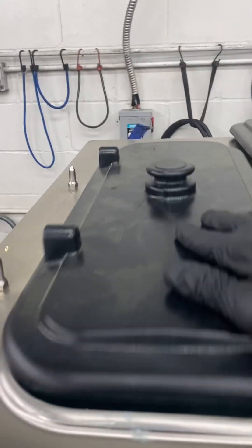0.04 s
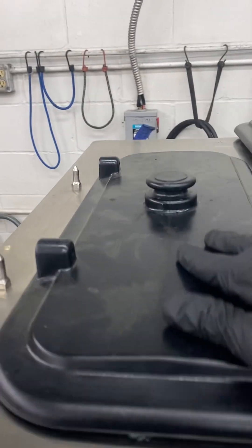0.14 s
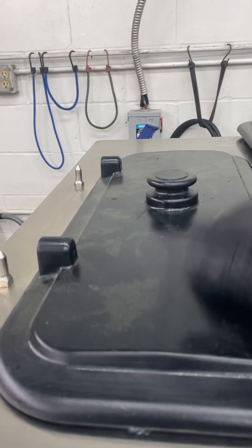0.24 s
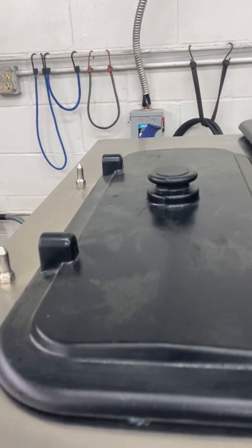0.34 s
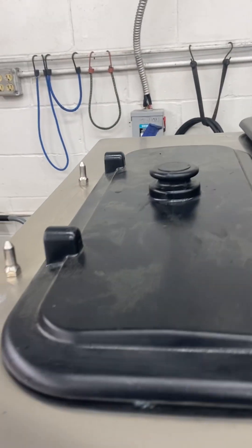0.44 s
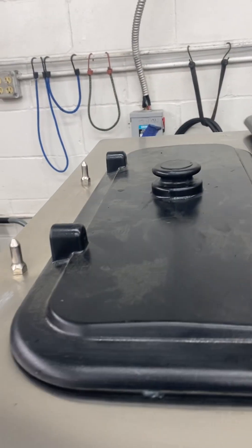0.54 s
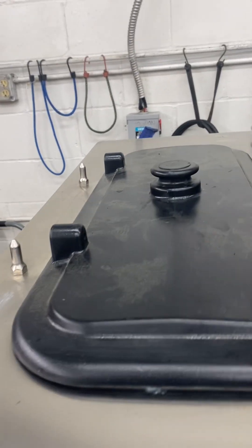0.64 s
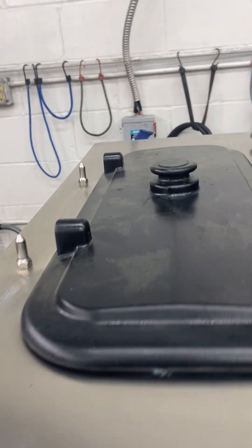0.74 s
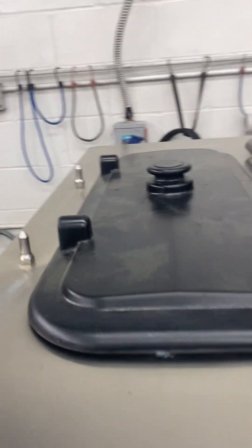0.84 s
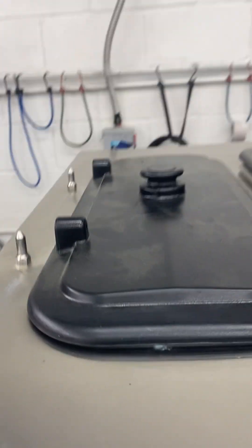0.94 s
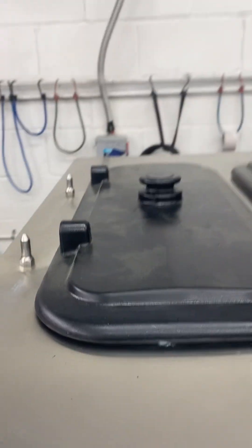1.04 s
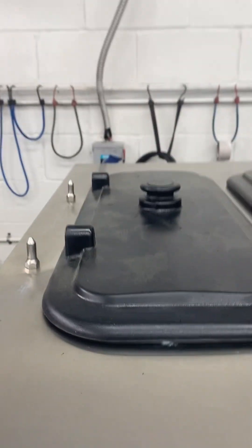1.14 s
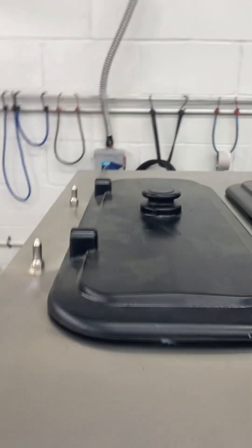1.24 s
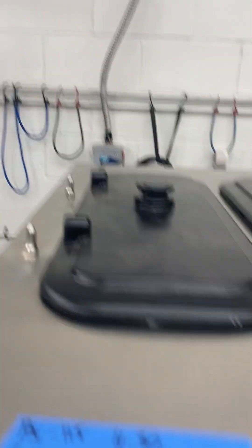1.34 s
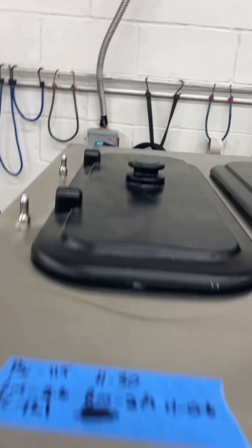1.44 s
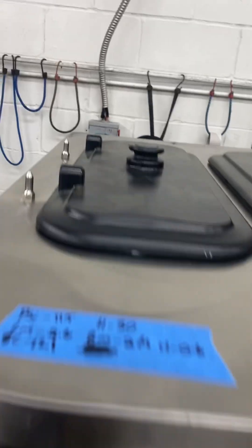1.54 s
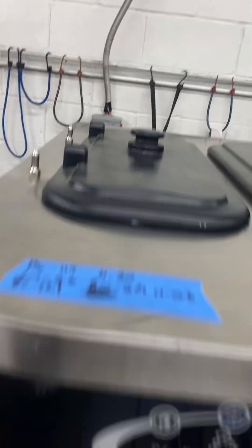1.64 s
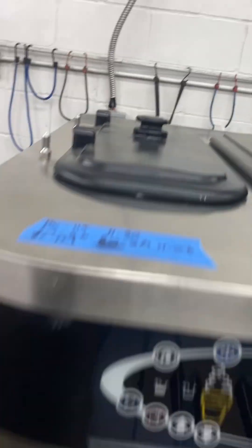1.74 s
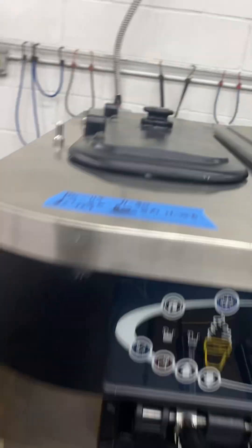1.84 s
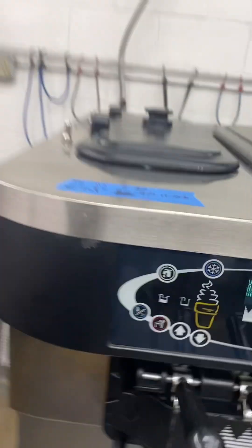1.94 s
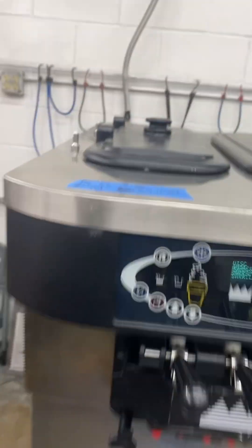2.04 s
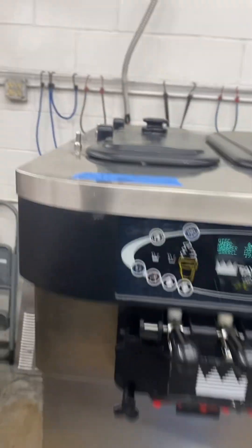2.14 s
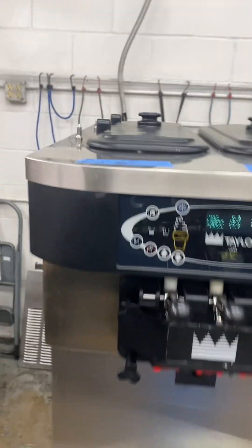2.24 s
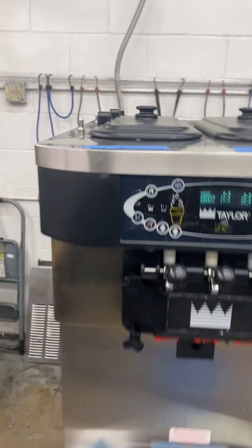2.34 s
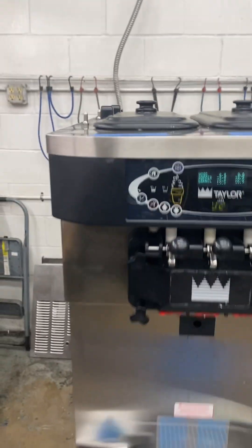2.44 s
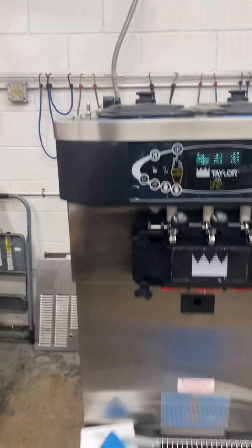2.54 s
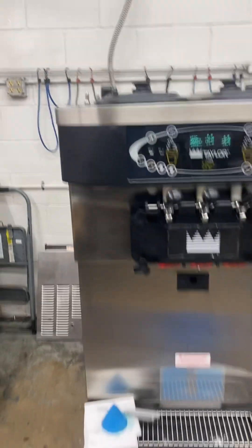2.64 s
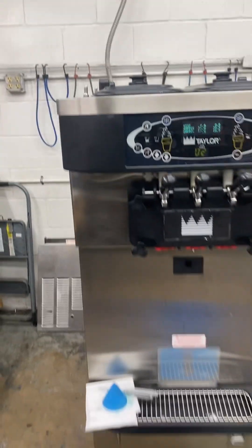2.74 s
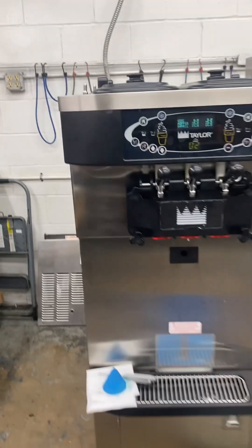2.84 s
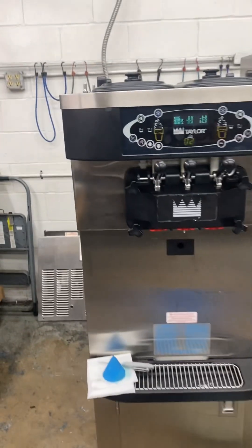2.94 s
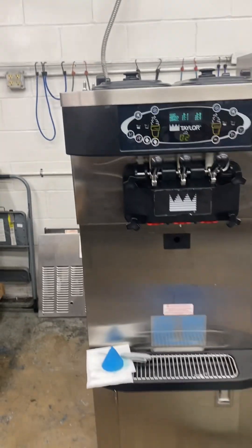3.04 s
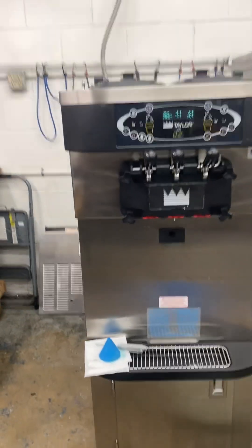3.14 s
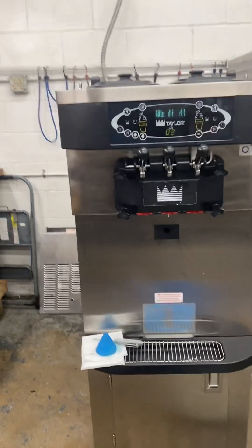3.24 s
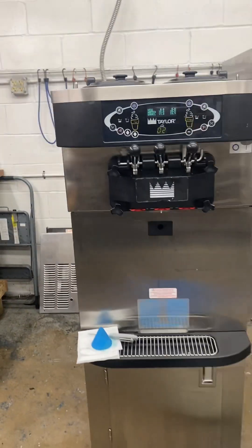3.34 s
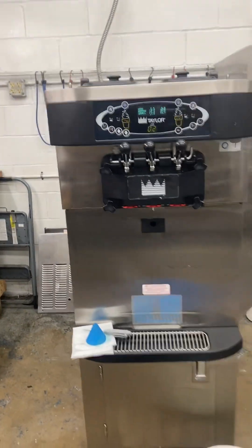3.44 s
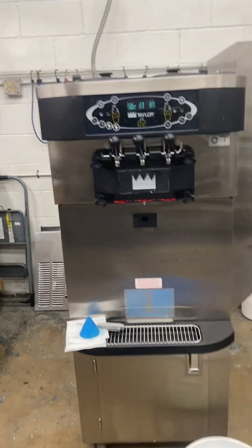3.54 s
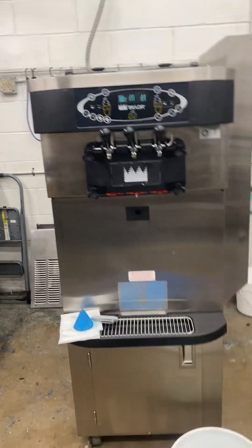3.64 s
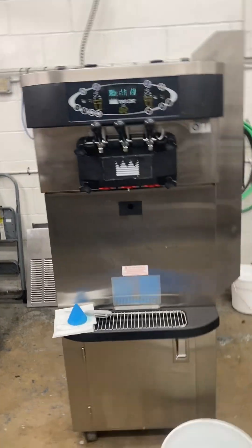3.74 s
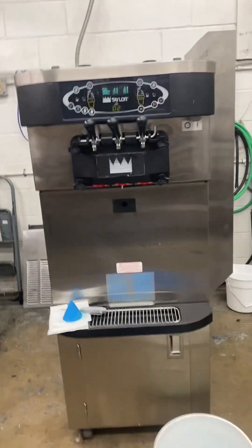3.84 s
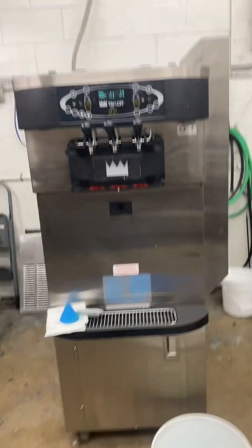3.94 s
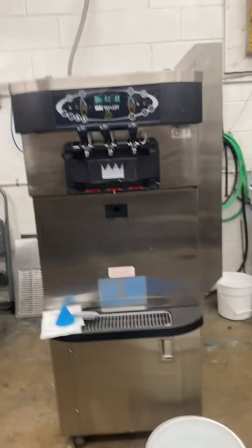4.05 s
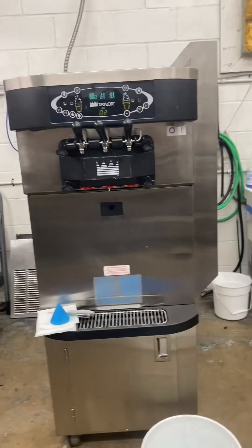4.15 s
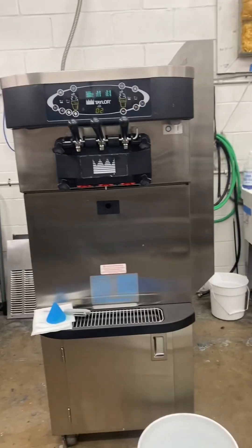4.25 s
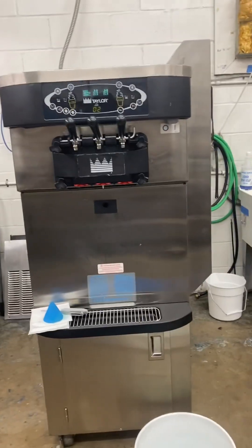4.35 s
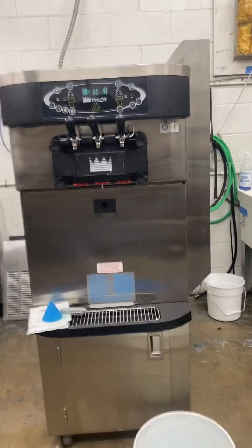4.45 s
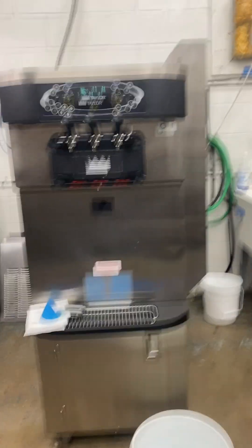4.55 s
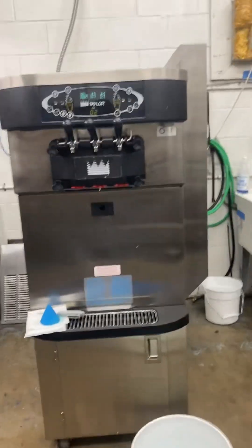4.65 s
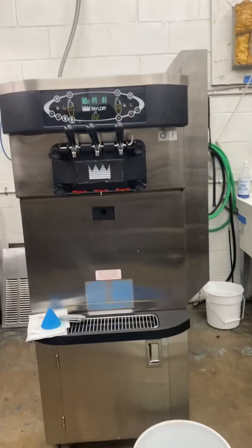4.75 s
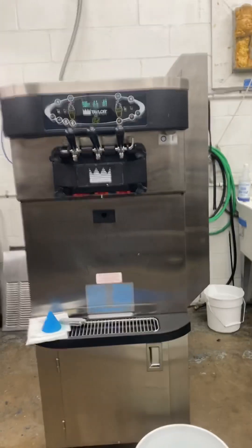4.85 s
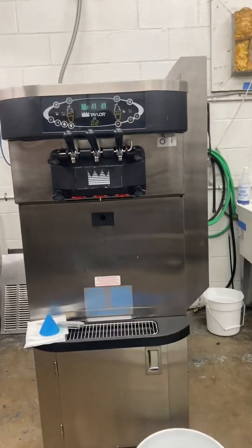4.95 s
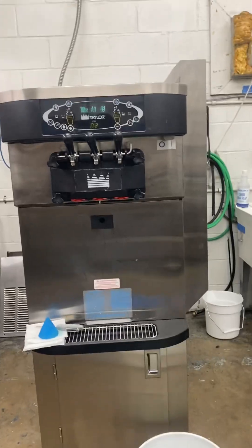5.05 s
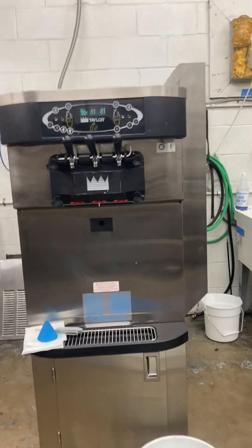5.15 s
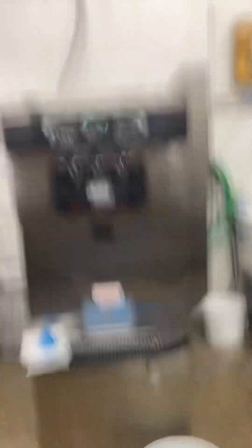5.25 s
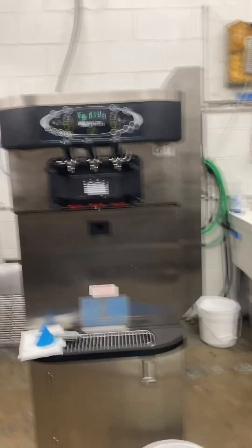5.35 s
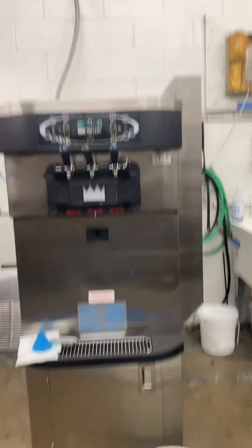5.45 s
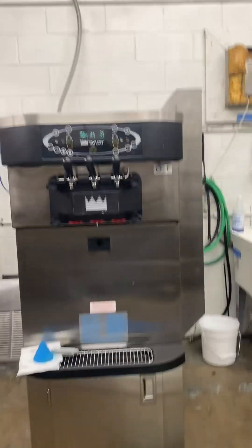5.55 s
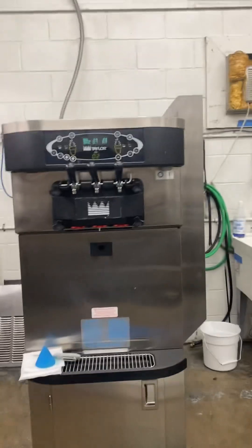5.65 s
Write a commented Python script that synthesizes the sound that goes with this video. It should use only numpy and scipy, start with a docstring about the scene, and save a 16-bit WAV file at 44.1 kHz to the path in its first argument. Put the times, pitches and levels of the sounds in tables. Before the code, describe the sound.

A handheld stereo phone starts close to a soft-serve machine in a hard-walled workshop. Right away, at about 0.05 to 0.16 s, a plastic lid bangs on a steel hopper in a loud, hollow, rattling burst, nearly overloading. It scrapes briefly, clatters again at 0.46 to 0.6 s, shuffles faintly, then knocks home at 0.95 to 1.05 s with quick weakening bounces and a soft drag until 1.4 s. Short echoes follow. Throughout, the machine runs: low electrical hum, fan and compressor roar, faint buzz, airy hiss, and a strong whine near 1300 Hz with a thinner whistle above. From about 1.5 to 4 s, the phone moves back and these tones swell, dip and shift between sides. Soft thumps come from 2.2 s, with more finger bumps from 4.2 s. Crisp taps and clicks stand out near 4.43, 5.2 to 5.3 and 5.65 s, while the machine continues to the end.

```python
"""A hard-walled workshop, where a soft-serve machine hums and whines near a hand-held phone.
A hand slides a plastic lid over a steel hopper and knocks it home in three rattling bursts: ringing modes,
loose clatter and scraping noise. Then the phone backs away through the standing waves of the motor tones,
made of swelling sines, and fingers shift on its case in short damped swings. Shaped noise makes the
roar, hiss and rumble, and a repeating rattle makes the buzz."""
import sys
import numpy as np
from scipy import signal
from scipy.fft import rfft, irfft
from scipy.io import wavfile
from scipy.ndimage import uniform_filter1d

SR = 44100
rng = np.random.default_rng(int(sys.argv[2]) if len(sys.argv) > 2 else 0)


def store_wav(level_fs):
    """Save 16-bit WAV to argv[1]."""
    pcm = np.round(np.clip(np.atleast_2d(level_fs), -1, 1) * 32767)
    wavfile.write(sys.argv[1], SR, pcm.T.astype(np.int16))


N = 251800  # length in samples
MAINS_HZ = 59.97


def amp(db):
    """Turn decibels into a plain multiplier."""
    return 10 ** (np.asarray(db) / 20)


def unit(x):
    """Scale a sound to an rms of 1."""
    return x / np.sqrt(np.mean(x ** 2) + 1e-20)


def over_hz(points, hz):
    """Read a curve of (Hz, value) points, joined evenly in pitch."""
    f, value = np.transpose(points)
    return np.interp(np.log(hz + 1), np.log(f + 1), value)


def over_time(rows, t):
    """Read each column of a table as a curve over time; the first column is seconds."""
    s, *columns = np.transpose(rows)
    return [np.interp(t, s, column) for column in columns]


def add(mix, s, sound):
    """Lay a sound into the mix from s seconds on, cut off at the end of the mix."""
    part = mix[..., round(s * SR):][..., :sound.shape[-1]]
    part += sound[..., :part.shape[-1]]


def wander(fastest_hz):
    """A slow random drift of rms 1, summed from sines up to fastest_hz."""
    t = np.arange(0, N / SR + 1, .01)
    slow = 0
    for f in fastest_hz * np.geomspace(.1, 1, num=12):
        slow = slow + np.sin(2 * np.pi * (f * t + rng.random())) / np.sqrt(f)
    return np.interp(np.arange(N) / SR, t, unit(slow))


def pair(common, opposed):
    """Left and right from what the two ports hear alike and what they hear with opposite sign."""
    return np.array([common + opposed, common - opposed])


def colour(x, shape):
    """Filter a sound by a curve of (Hz, dB) points."""
    return irfft(rfft(x) * amp(over_hz(shape, np.fft.rfftfreq(len(x), 1 / SR))), len(x))


def tone(hz, left_db, right_db, lead, slip=0):
    """One sine at both ports, left ahead by lead (rad); a moving slip (turns) blurs its pitch."""
    turn = 2 * np.pi * (hz * np.arange(N) / SR + rng.random() + slip)
    left = amp(left_db) * np.sin(turn + lead / 2)
    right = amp(right_db) * np.sin(turn - lead / 2)
    return np.sqrt(2) * np.array([left, right])


def noise(shape, level_db, patchy_db):
    """Noise from random short spectra with drifting patches; shape and level_db add up in dB."""
    frames, hz = N // 256 + 5, np.fft.rfftfreq(1024, 1 / SR)
    a, b, patches = rng.standard_normal((frames, 513, 3)).T
    patches = uniform_filter1d(patches, size=10, axis=0)
    patches = unit(uniform_filter1d(patches, size=12, axis=1))
    frame_s = np.arange(frames) * 256 / SR
    db = over_hz(shape, hz)[:, None] + level_db(hz[:, None], frame_s) + patchy_db * patches
    return signal.istft((a + 1j * b) * amp(db), nperseg=1024, noverlap=768)[1][:N]


# How far ahead the left port hears a near source. Each row: pitch in Hz, left lead in radians.
PORT_LEAD = [(0, 0), (2070, -.1), (3190, 2.4), (3880, 1.), (5170, .4), (6550, 2.7), (8180, 3.6),
             (9730, 6.1), (11500, 6.7), (12600, 9.2), (14700, 9.9), (16500, 12.6)]
# How much louder the left port hears it. Each row: pitch in Hz, left minus right in dB.
PORT_BALANCE = [(60, -.5), (200, -1.5), (380, -3), (700, -4), (1290, -3), (2380, -1.5), (4400, 0),
                (15000, 0)]


def ports(x):
    """A near source reaches the two ports with its own lead and balance."""
    hz = np.fft.rfftfreq(N, 1 / SR)
    half = amp(over_hz(PORT_BALANCE, hz) / 2) * np.exp(.5j * over_hz(PORT_LEAD, hz))
    return irfft(rfft(x) * np.array([half, 1 / half]), N)


def ring(modes, tilt_db, chance, scatter_db, centre_hz=500, focus_db=0):
    """One blow: the modes rise together, any focus favours those near centre_hz; peak 1."""
    hz, db, t60 = np.transpose(modes)[..., None]
    t = np.arange(9000) / SR
    size, detune = chance[..., None]
    octaves = np.log2(hz / centre_hz)
    focus = focus_db * np.minimum(abs(octaves), 1.3)
    db = db + scatter_db * size + tilt_db * octaves - focus - 60 * t / t60
    swing = np.sin(2 * np.pi * hz * (1 + 0.021 * detune) * t)
    sound = (np.sign(detune) * amp(db) * swing).sum(0)
    sound = sound * (1 - np.exp(-t / 0.00049))  # quick rise in seconds
    return sound / abs(sound).max()


# The lid's own ringing tones over the hopper, before random scatter.
# Each row: pitch in Hz, relative level in dB, time to fade by 60 dB in seconds.
LID = [(79, -20, 0.12), (151.6, -11.5, 0.11), (253, 2.5, 0.036), (334, -3, 0.098), (454, 0, 0.05),
       (593, -9, 0.086), (725.4, -8.5, 0.09), (907, -7, 0.04), (1147, -10.5, 0.067), (1387, -16, 0.065),
       (1745, -8, 0.036), (2050, -14, 0.031), (2530, -20, 0.038), (3340, -15, 0.017)]
STRUCK_DB, STRUCK_T60_S = 3, 0.044


def struck(hz):
    """Lid modes, plus the patch of lid under the blow, which rings at its own pitch."""
    return [*LID, (hz, STRUCK_DB, STRUCK_T60_S)]


# The lid settles after a burst.
# Each row: start in seconds, first blow in dB, first rim tick in dB, number of bounces.
SETTLE = [(0.581, -22.5, -55, 4), (1.036, -16.5, -28.5, 7)]
BOUNCE_GAP_S, BOUNCE_HZ = 0.011, 380  # both varied at random
BOUNCE_LOSS_DB, BOUNCE_TICK_LOSS_DB = 2, 2.5  # lost at each bounce


def bounces():
    """Uneven, ever weaker knocks as the lid settles, as rows like those of KNOCKS."""
    rows = []
    for s, blow_db, tick_db, many in SETTLE:
        gap, hard, where = rng.random((round(many), 3)).T
        k = np.arange(len(gap))
        starts = s + BOUNCE_GAP_S * (k + .6 * gap)
        blows = blow_db - BOUNCE_LOSS_DB * k
        ticks = tick_db - BOUNCE_TICK_LOSS_DB * k
        rows += zip(starts, blows, ticks, 0.43 * hard, BOUNCE_HZ * (0.76 + where))
    return rows


# Knocks of the lid. Each row: start in seconds, blow in dB, rim tick in dB before a trim,
# hardness from 0 to 1, most excited pitch in Hz.
KNOCKS = [(.050, -13.5, -38, 0, 457), (0.065, -12.5, -41, 0.5, 399), (.078, -10, -30, 0.7, 295),
          (0.083, -3.5, -8.5, 0.92, 230), (.088, 4.5, -48, 0.38, 240), (0.097, -1, -11.5, 0.9, 300),
          (.106, -3, -26, 0.9, 610), (.115, -2, -41, 0.4, 306), (0.12, -3.5, -11.5, 0.5, 990),
          (.1255, -7, -11.5, 0, 336), (0.135, -6, -17, 0.1, 203), (.144, -20, -33, 0.2, 298),
          (.153, -25, -42, 0.6, 297), (.162, -17, -55, 0, 240), (.458, -6.5, -15.5, 0.9, 544),
          (.464, -2, -49, 0.7, 325), (.472, -6, -50, 0.2, 470), (.479, -4, -36, 0.3, 306),
          (.491, -2.5, -43, 0.2, 380), (.5045, -6.5, -33, 1, 695), (.509, -8.5, -47, 0.7, 333),
          (.514, -7.5, -50, 0.2, 150), (.518, -12, -43, .9, 1000), (.522, -4.5, -37, 0.9, 614),
          (.525, -11.5, -45, 0.7, 1180), (.527, -7, -42, 0.5, 342), (.536, -7.5, -32, 0.9, 334),
          (.540, -6.5, -45, 0.93, 720), (.556, -15, -46, 0.7, 1190), (0.567, -12, -42, 0.6, 678),
          (.576, -14, -50, 0.4, 460), (0.623, -40, -61, 0.3, 338), (.654, -11.5, -55, 0, 334),
          (.688, -16.5, -58, 0.4, 327), (.706, -22, -58, .2, 240), (.768, -26, -58, 0.4, 325),
          (.794, -23, -57, 0.7, 610), (.799, -21, -57, .3, 300), (.811, -21.5, -56, 0.7, 780),
          (.813, -21, -58, 0.1, 173), (.832, -33, -63, .3, 765), (.836, -23, -58, 0, 165),
          (.861, -19.5, -58, .1, 270), (.874, -22, -58, 0, 283), (.889, -20, -58, .1, 262),
          (.904, -21, -58, .1, 300), (.914, -19, -49, 0.7, 402), (.921, -16.5, -50, .6, 450),
          (.936, -15, -50, .4, 210), (.944, -14, -48, 0.3, 233), (.955, -19, -28, .5, 300),
          (.959, -17, -9, 0.2, 487), (.963, -4, -42, 0.55, 244), (.967, -4, -30, 0.4, 224.6),
          (.974, -8, -14.5, 0.2, 231), (.979, -8, -31, .5, 328), (.985, -2.5, -14, 0.2, 328),
          (0.989, -10, -11, 0.7, 465), (0.994, -10, -15.5, 0.8, 783), (.998, -11.5, -22, 0.4, 120),
          (1.004, -9, -24, 1, 860), (1.011, -7.5, -27, 0.4, 246), (1.027, -9.5, -27, 0.05, 270),
          (1.039, -12.5, -35, 0.5, 724)]
# Ringing of the rim against steel, before random scatter.
# Each row: pitch in Hz, relative level in dB, time to fade by 60 dB in seconds.
RIM = [(2720, -5, 0.015), (3620, -7, 0.015), (5120, -1, 0.017), (5700, 6, 0.0076), (6200, 13, 0.012),
       (8800, 2.5, 0.0084), (9800, 2.5, 0.0055), (11370, 0, 0.0044), (14900, -3, 0.0056)]
# Colour of the loose clatter after each tick. Each row: pitch in Hz, relative level in dB per Hz.
CLATTER = [(300, -20), (800, 12.5), (2000, 6), (3000, -0.5), (5000, 0.5), (7500, 0), (10000, -12),
           (13000, -11), (16000, -34)]
# The clatter's parts: a sharp crack, a grainy shake and a lingering tail, relative to each other.
CRACK_DB, SHAKE_DB, TAIL_DB = 6.5, -14, -28
CRACK_T60_S, SHAKE_T60_S, TAIL_T60_S = 0.011, 0.06, 0.19
# Strokes of the lid dragged over the steel. Each row: start in seconds, end in seconds,
# start level in dB, end level in dB, most excited pitch in Hz.
DRAG = [(0., 0.031, -27, -31, 243), (0.028, 0.068, -39, -17.5, 460), (0.172, 0.272, -24, -38.5, 208),
        (0.269, 0.415, -32, -39, 350), (0.467, 0.556, -31, -32, 1117), (0.558, 0.66, -24.5, -23.5, 346),
        (0.582, 0.739, -31, -35.5, 730), (0.743, 0.86, -30, -39, 295), (0.906, 0.96, -31, -24, 276),
        (1.08, 1.17, -28.5, -41, 300), (1.15, 1.416, -33.5, -51, 313)]


def lid():
    """Knocks ring lid and rim and shake loose clatter; dragging feeds the lid a hail of tiny slips."""
    out, t = np.zeros(N), np.arange(9000) / SR
    # about 450 tiny contacts a second make the clatter grainy
    contacts = amp(4.1 * np.minimum(rng.exponential(1, N), 4)) * (rng.random(N) < 450 / SR)
    contacts = uniform_filter1d(contacts, size=60)
    loose = unit(colour(rng.standard_normal(N), CLATTER))
    grain = unit(0.45 + unit(contacts))
    clatter_rise = 1 - np.exp(-(t / 0.0017) ** 2)
    for s, blow_db, tick_db, hard, hz in [*KNOCKS, *bounces()]:
        chance = rng.standard_normal((2, len(RIM) + len(LID) + 1))
        rim_chance, lid_chance = chance[:, :len(RIM)], chance[:, len(RIM):]
        tilt_db = 8.2 * (hard - .5)  # harder blows sound brighter
        body = ring(struck(hz), tilt_db, lid_chance, scatter_db=2.5, centre_hz=hz, focus_db=6.0)
        add(out, s, amp(blow_db) * body)
        add(out, s, amp(tick_db - 1.5) * ring(RIM, 0, rim_chance, scatter_db=6.5))
        span = slice(round(s * SR), round(s * SR) + len(t))
        crack = amp(CRACK_DB - 60 * t / CRACK_T60_S)
        shake = grain[span] * amp(SHAKE_DB - 60 * t / SHAKE_T60_S)
        tail = amp(TAIL_DB - 60 * t / TAIL_T60_S)
        add(out, s, amp(tick_db + 3.0) * (crack + shake + tail) * clatter_rise * loose[span])
    # about 800 slips a second, of random size and sign
    slips = amp(2.55 * np.minimum(rng.exponential(1, N), 5)) * rng.choice([-1, 1], N)
    slips = slips * (rng.random(N) < 800 / SR)
    for start, end, start_db, end_db, hz in DRAG:
        n = round((end - start) * SR)
        chance = rng.standard_normal((2, len(LID) + 1))
        body = ring(struck(hz), -1.8, chance, scatter_db=0.5, centre_hz=hz, focus_db=6.5)
        feed = slips[round(max(start, 0) * SR):][:n + len(t)]
        scrape = unit(signal.oaconvolve(feed, body)[len(t):][:n])  # skip the build-up
        level = amp(np.linspace(start_db, end_db, n)) * signal.windows.tukey(n, .15)
        add(out, max(start, 0), level * scrape)
    return out


def workshop(x):
    """Echoes off hard walls as sparse random taps: middle pitches last longest, treble dies first."""
    taps = rng.standard_normal(SR // 2) * (rng.random(SR // 2) < .05)
    hz, t, z = signal.stft(taps, SR, nperseg=256)
    t60 = over_hz([(200, 0.083), (2000, 0.2), (10000, 0.051)], hz)[:, None]  # (Hz, s)
    tail = signal.istft(z * amp(-60 * t / t60), SR, nperseg=256)[1]
    return signal.fftconvolve(x, tail / np.linalg.norm(tail))[:N]


def blip(hz, db, turns, glide, settle):
    """A few damped swings of the case; the pitch falls fast and settles at a share of hz; peak at db."""
    u = np.arange(round(8 * turns * SR / hz)) * hz / SR  # time in turns of hz
    phase = settle * u + glide * (1 - np.exp(-u / 2.64))
    swing = (1 - np.exp(-u / 0.039)) * np.exp(-u / turns) * np.sin(2 * np.pi * phase)
    return amp(db) * swing / abs(swing).max()


# Fingers on the phone case; the pitches are nominal, as each swing glides.
# Each row: start in seconds, opposed tick in dB, tick pitch in Hz, common thump in dB, thump pitch in Hz.
GRIP = [(2.179, -58, 250, -26.5, 206), (2.46, -47, 400, -26, 354), (3.578, -47, 500, -26.5, 490),
        (3.952, -21, 670, -37, 117), (4.223, -50, 500, -24.5, 250), (4.242, -42, 490, -25, 261),
        (4.287, -42, 500, -29, 250), (4.299, -43, 400, -25, 262), (4.365, -46, 500, -30, 280),
        (4.4298, -19, 640, -24, 340), (4.439, -26, 403, -22, 324), (4.446, -37, 250, -34, 93),
        (4.522, -26, 600, -28, 241), (4.664, -25, 550, -24.5, 240), (4.831, -22, 600, -24.5, 260),
        (5.021, -27, 600, -26.5, 250), (5.207, -12, 1400, -36, 151), (5.2146, -27, 249, -20.5, 126),
        (5.222, -20, 447, -17, 66.6), (5.226, -32, 500, -24.5, 380), (5.258, -22, 594, -24.5, 211),
        (5.316, -17, 900, -34, 97), (5.629, -39, 600, -27, 305), (5.644, -25, 700, -26, 346),
        (5.67, -19, 1100, -30, 300)]
# Nail clicks on the case. Each row: start in seconds, level in dB, pitch in Hz,
# upper mode in dB relative to the lower, phase blur in radians before smoothing.
CLICKS = [(4.438, -34, 1930, -5, 0.75), (5.207, -16, 1650, -2, 0.17), (5.225, -24, 2150, 2, 0.62),
          (5.230, -23.5, 2200, 4, 0.68), (5.232, -27, 1690, 8, .6), (5.237, -33, 2260, 6, 1.1),
          (5.314, -20, 3740, -18, .3), (5.644, -15.5, 5310, 4.5, 1.9), (5.694, -21.5, 5660, -15, 1.6)]
CLICK_UPPER, CLICK_T60_S = 2.02, 0.0054  # upper mode as a ratio of the lower; fade by 60 dB


def grip():
    """The case flexes: the ports feel ticks in opposition and thumps together; nails click on it."""
    common, opposed = np.zeros((2, N))
    for s, tick_db, tick_hz, thump_db, thump_hz in GRIP:
        add(opposed, s, blip(tick_hz, tick_db, turns=2.6, glide=2.3, settle=0.47))
        add(common, s, blip(thump_hz, thump_db, turns=0.95, glide=0.79, settle=0.87))
    snaps = np.zeros(N)
    t = np.arange(400) / SR
    for s, db, hz, upper_db, blur in CLICKS:
        turn = 2 * np.pi * hz * t + blur * uniform_filter1d(rng.standard_normal(len(t)), size=4)
        crack = np.sin(turn) + amp(upper_db) * np.sin(CLICK_UPPER * turn)
        fade = amp(db - 60 * t / CLICK_T60_S) * (1 - np.exp(-t / 0.00035))
        add(snaps, s, fade * crack)
    return pair(common, opposed) + ports(snaps)


def crossings(nodes, multiple, t):
    """Level change in dB as the phone passes this tone's nodes and bellies, each a smooth bump."""
    db = 0
    for m, s, change_db, width in nodes:
        if round(m) == round(multiple):
            db = db + change_db * np.exp(-((t - s) / width) ** 2)
    return db


# Distance from the machine. Each row: time in seconds, distance from 0 (near) to 1 (far).
AWAY = [(0, 0.091), (2., 0.23), (3.8, 0.89), (4.4, 0.88), (5.71, 1)]
# Strongest motor tone, 22 times the mains, as the phone moves.
# Each row: time in seconds, left in dB, right in dB, left lead in radians.
WHINE = [(0.02, -51, -31.5, 2.9), (0.25, -52, -38, 3.3), (0.4, -51, -33, 3.8), (0.7, -38, -40.5, 3.9),
         (0.9, -31, -29, 6.1), (1.15, -47, -42, 7.4), (1.25, -37.5, -30, 5.3), (1.52, -30, -33.5, 5.5),
         (1.7, -34.5, -34.5, 6.6), (1.85, -30, -26.5, 5.3), (1.95, -41, -33, 8.7), (2.13, -30, -41, 13.7),
         (2.35, -34.5, -32, 13.8), (2.53, -41, -34, 13.7), (2.65, -28, -40, 14.2), (2.83, -38.5, -28, 13.6),
         (2.97, -28, -26.5, 12.7), (3.18, -39.5, -37, 12), (3.5, -44, -29, 13.3), (3.68, -41, -29.5, 13.6),
         (4.05, -40.5, -33.5, 16.2), (4.55, -35, -30.5, 16.8), (5.3, -35, -30, 16.6),
         (5.71, -31, -30, 16.8)]
# Other mains multiples, before slow drift. Each row: multiple, near level in dB, far level in dB,
# left minus right in dB, left lead near in radians, left lead far in radians.
TONES = [(4, -58.5, -47, -1, 0, 0.15), (6, -41, -51, -4, 0.5, -1.9), (10, -59, -45.5, -4, -1.5, 0),
         (18, -51.5, -56, -6, -1.5, 2.3), (20, -48, -44, 5, 4, -2.2), (23, -58, -44.5, 3, 2, -1.9),
         (24, -50.5, -53.5, 2, -1.5, 2), (26, -48, -46.5, -4.5, 2.5, -1)]
# The phone crosses a node (minus) or belly (plus) of a standing wave.
# Each row: multiple of the mains, time in seconds, change in dB, half width in seconds.
NODES = [(4, 1.3, -17, 0.27), (4, 2.85, 8.5, 0.96), (6, 0.42, -2, 0.78), (6, 1.6, 2, 0.51),
         (6, 3.42, -17, 0.47), (10, 2.37, 6, 0.2), (10, 2.85, -3.5, 0.45), (10, 3.9, 0, 0.24),
         (18, 1.2, 0, 0.34), (18, 2.1, 3.5, 0.43), (18, 2.93, -16, 0.46), (18, 3.53, 8.5, 0.34),
         (20, 3.1, -12, 0.1), (20, 3.43, 6, 0.28), (23, 3.1, -9, 0.27), (24, 1.7, 8.5, 0.11),
         (24, 2, 2, .1), (24, 1.98, 11, 0.2), (24, 2.8, -2, 0.17), (24, 2.9, 7, 0.12), (24, 3.53, 11, 0.18),
         (26, 1.07, -10, 0.14), (26, 1.8, -1.5, 0.17), (26, 0.91, 3, 0.079), (26, 3.08, -9, 0.19),
         (26, 3.77, -7, 0.14)]
# Fan whistle, before its swell and flutter. Rows in turn: left in dB, right in dB,
# left lead in radians; each row holds the near value, then the far one.
WHISTLE = [(-66, -51.5), (-51.5, -48.5), (2, 1.8)]
WHISTLE_HZ = 2745
# Slow swell of the whistle. Each row: time in seconds, change in dB.
WHISTLE_SWELL = [(0, -2), (1.2, 2.5), (1.7, 3.5), (2.5, -1), (2.95, 6), (3.4, -3), (4.1, -1.5), (4.5, 1.5),
                 (5.1, 3.5), (5.71, -2)]
# Weaker shaft, fan and winding tones, before drift.
# Each row: pitch in Hz, near level in dB, far level in dB.
FAINT = [(152, -55, -60), (266, -47, -54), (800, -50, -60), (1064, -56, -55), (1855, -57, -71),
         (2159, -65, -62.5), (2288, -65, -58), (2794, -68, -60), (3182, -64, -64), (3354, -63, -68),
         (3461, -74, -64), (3615, -64, -66), (3946, -64, -68)]


def motor():
    """Mains multiples swell and fade through their standing waves; fan whistle and faint tones join."""
    t = np.arange(N) / SR
    out = tone(22 * MAINS_HZ, *over_time(WHINE, t))
    away = over_time(AWAY, t)[0]
    for k, near_db, far_db, tilt_db, near, far in TONES:
        db = near_db + away * (far_db - near_db) + 1.9 * wander(2.97) + crossings(NODES, k, t)
        lead = near + away * (far - near) + 0.19 * wander(1.8)
        out += tone(round(k) * MAINS_HZ, db + tilt_db / 2, db - tilt_db / 2, lead)
    left_db, right_db, lead = (near + away * (far - near) for near, far in WHISTLE)
    flutter_db = 2.3 * wander(17.0) + over_time(WHISTLE_SWELL, t)[0]
    out += tone(WHISTLE_HZ, left_db + flutter_db, right_db + flutter_db, lead, 0.14 * wander(25.))
    for hz, near_db, far_db in FAINT:
        db = near_db + away * (far_db - near_db)
        high = hz > 2000
        apart = min(hz / 1100, 1)  # long waves waver less and reach both ports more alike
        db = db + (2.0 + 0.81 * apart) * wander(2.96)
        db = db - 5.1 * high * (abs(wander(14.)) - .8)  # high tones flutter in short patches
        left_db = db + 2.7 * apart * wander(3.3)
        lead = 1.06 * apart * wander(0.78)
        slip = hz * 8e-5 * wander(12.) + 0.06 * high * wander(30.)
        out += tone(hz, left_db, db, lead, slip)
    return out


# Multiples of the compressor shaft turn (half the mains), rounded to whole numbers when played.
# Each row: multiple, near level in dB, far level in dB, before drift,
# left lead near in radians, left lead far in radians.
SHAFT = [(11, -45.5, -54, 0.14, 1.1), (21, -68, -56.5, 0, 2), (24, -53.5, -66, 0, 5),
         (29, -57, -60, -0.84, -2.5), (32, -63.5, -64.5, 0, 0.5), (42, -69, -54.5, 0, 3),
         (43, -54.5, -49.5, -1.3, -3), (45, -58, -52, -1, -2.5), (47, -59, -51.5, -0.6, -2),
         (49, -50.5, -61, 0, 2.5), (50, -58.5, -60, 0, 0), (51, -58, -60, 0, 0.5), (54, -69, -70, 0, -1),
         (56, -57.5, -54.5, 0, 1.5), (80.46, -60.5, -54, 1, 1.5), (84.3, -62, -59.5, 1, 1),
         (87.2, -65.5, -61.5, 0, 0)]
# Nodes and bellies of those lines; a row acts only where SHAFT has its rounded multiple.
# Each row: multiple, time in seconds, change in dB, half width in seconds.
SHAFT_NODES = [(11, 2.4, 2.5, 0.48), (45, 2.7, 5.5, .3), (47, 3.63, 8.5, .3), (45, 3.55, 5, .2),
               (49, 3.5, 7, .25), (56, 2.8, 0, 0.34), (56, 3.7, 4, 0.34), (80, 3.3, -9, .25),
               (88, 3.4, 2, .4)]


def shaft():
    """Lines on multiples of the shaft turn, each swelling slowly on its own."""
    t = np.arange(N) / SR
    away = over_time(AWAY, t)[0]
    out = 0
    for k, near_db, far_db, near, far in SHAFT:
        db = near_db + away * (far_db - near_db) + 1.16 * wander(2.44) + crossings(SHAFT_NODES, k, t)
        left_db = db + 0.86 * wander(2.7)
        lead = near + away * (far - near) + .4 * wander(1.48)
        out = out + tone(round(k) * MAINS_HZ / 2, left_db, db, lead, 0.037 * wander(20.))
    return out


def buzz():
    """The compressor rattles once per shaft turn: a faint comb of lines that slowly changes its stroke."""
    turns = np.arange(N) * MAINS_HZ / 2 / SR
    place = (turns % 1 * 1470).astype(int)  # 1470 steps in one turn
    strokes = rng.standard_normal((4, 1470))[:, place]
    rattle = sum(amp(5.6 * wander(1.24)) * stroke for stroke in strokes)
    shape = [(300, -40), (600, 1.0), (1400, -14), (1900, -2.5),
             (2600, -1.0), (3600, 4.5), (5000, 2.5), (6200, -35)]  # (Hz, dB)
    return amp(-51) * ports(unit(colour(rattle, shape)))


# Roar that both ports hear alike. Each row: pitch in Hz, relative level in dB per Hz.
ROAR = [(15, -58), (25, -42.5), (126, -4), (192, -11), (251, -4), (427, -11), (595, -11.5), (650, -11.5),
        (1130, -15.5), (1320, -8.5), (1410, -17), (1760, -17), (2750, -13), (5000, -28.5), (6500, -58),
        (11000, -120)]
# Roar that the ports hear in opposition. Each row: pitch in Hz, relative level in dB per Hz.
ROAR_OPPOSED = [(15, -64), (25, -29.5), (210, -19), (350, -4.5), (418, -9.5), (595, -2), (991, -6),
                (1240, -7), (1320, -13), (1800, -15), (2690, -5.5), (4010, -15.5), (5000, -14), (6500, -70),
                (11000, -120)]
# How the roar changes, before each part's trim.
# Each row: time in seconds, roar level in dB, extra bass in dB.
ROAR_DB = [(0.0, -42.5, -10), (0.14, -42.5, 14), (0.92, -44.5, 12.5), (1.1, -42, 10), (1.29, -43, 2.5),
           (1.59, -45, 1.5), (4.04, -43.5, -2), (4.15, -44, 0), (5.71, -45, 7)]


def roar():
    """Fans and compressor as shaped noise, throbbing lightly at twice the mains."""
    s, db, bass_db = np.transpose(ROAR_DB)

    def level(hz, t):
        return np.interp(t, s, db) + np.interp(t, s, bass_db) / (1 + (hz / 350) ** 2)

    throb = 1 + 0.13 * np.sin(4 * np.pi * MAINS_HZ * np.arange(N) / SR)
    common = amp(-3.5) * noise(ROAR, level, patchy_db=2.0)
    opposed = amp(-11.0) * noise(ROAR_OPPOSED, level, patchy_db=1)
    return throb * pair(common, opposed)


# Air hiss that both ports hear alike, strong near 10 kHz.
# Each row: pitch in Hz, relative level in dB per Hz.
HISS = [(2940, -37.5), (5000, 0), (6350, -10.5), (6870, -35), (7120, -46), (7220, -79), (7740, -38.5),
        (8590, -9), (11900, -9.5), (12800, -41), (13500, -47), (14800, -28.5), (15700, -18), (16200, -29),
        (16400, -28)]
# Air hiss that the ports hear in opposition, strong near 7 and 14 kHz.
# Each row: pitch in Hz, relative level in dB per Hz.
HISS_OPPOSED = [(2940, -34), (5000, -4), (5500, 0), (8100, 0.5), (9310, -5.5), (9930, -19), (10100, -43),
                (10500, -40), (11100, -12.5), (12900, -3), (15500, -19), (15900, -19), (16400, -61)]
HISS_DB = -53  # rms of the common part


def hiss():
    """Air hiss: shaped noise with no change of overall level."""
    def still(hz, t):
        return 0 * t

    common = unit(noise(HISS, still, patchy_db=2.0))
    opposed = unit(noise(HISS_OPPOSED, still, patchy_db=1.5))
    return amp(HISS_DB) * pair(common, amp(-1.0) * opposed)


# Brief swells of the rumble. Each row: time in seconds, added level in dB.
JOLTS = [(.03, -36), (.14, -35), (1.0, -38), (1.2, -46), (3.98, -47), (4.45, -39), (5.24, -29)]
JOLT_RISE_S, JOLT_FALL_S = 0.032, 0.04
REST_DB, CARRY_DB, CARRY_FROM_S = -60, -52, 2.3  # level at rest, then while carried


def rumble():
    """Lumpy bass noise, nearly alike at both ports, with jolts and a higher level once carried."""
    t = np.arange(N) / SR
    shape = [(15, -24.0), (40, 5.0), (70, 10.0), (110, -25), (200, -70)]  # (Hz, dB)
    lumps = unit(colour(rng.standard_normal(N), shape))
    carried = np.clip((t - CARRY_FROM_S) / JOLT_RISE_S, 0, 1)
    level = amp(REST_DB + (CARRY_DB - REST_DB) * carried)
    for s, db in JOLTS:
        level = level + amp(db) * np.exp(-abs(t - s) / np.where(t < s, JOLT_RISE_S, JOLT_FALL_S))
    return level * lumps * np.array([[1.1], [.9]])  # left a little louder


def scene():
    """Lid, machine, wall echoes, fingers and rumble together."""
    knocks = lid()
    machine = motor() + shaft() + buzz() + roar() + hiss()
    walls = amp(-18.0) * pair(0, workshop(knocks))  # echoes from the sides
    near = ports(knocks + amp(-11.5) * workshop(knocks))
    return machine + near + walls + grip() + rumble()


EDGE_HZ = 16500


def record(dry):
    """Bass roll-off of the microphone, soft overload on the loudest knocks, then the band limit."""
    lean = signal.sosfilt(signal.butter(2, 60., "high", fs=SR, output="sos"), dry)
    soft = 0.89 * np.tanh(lean / 0.94)
    band = signal.firwin(511, EDGE_HZ, window=("kaiser", 9), fs=SR)
    return signal.oaconvolve(soft, band[None], "same")


dry = scene()
out = record(dry)
store_wav(out)
```